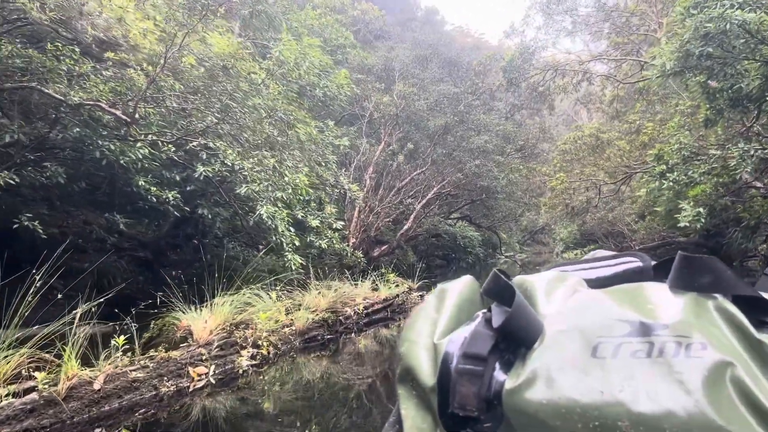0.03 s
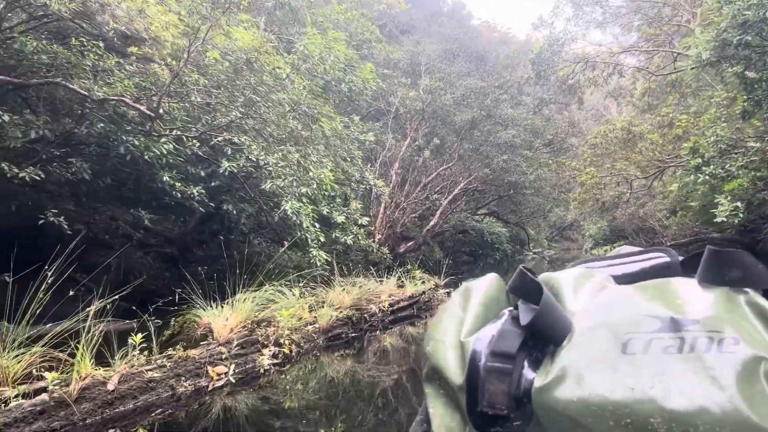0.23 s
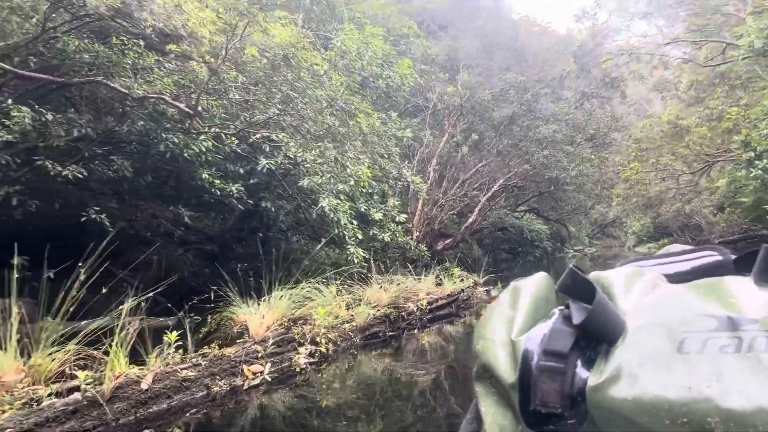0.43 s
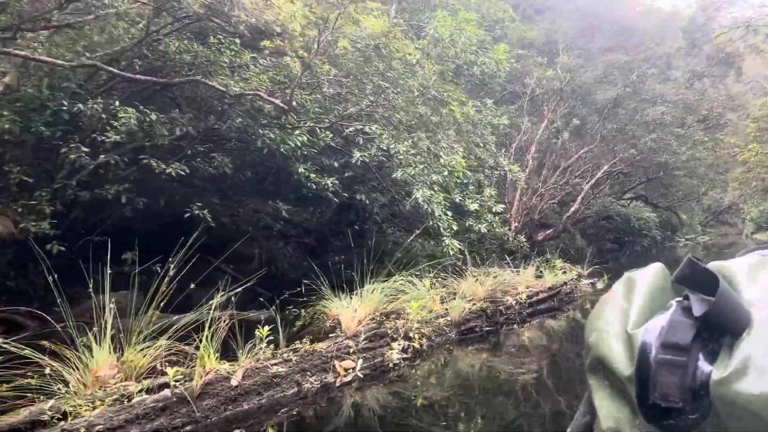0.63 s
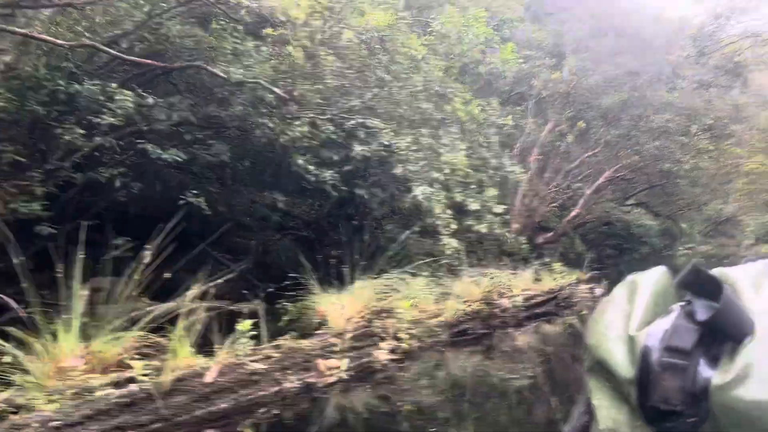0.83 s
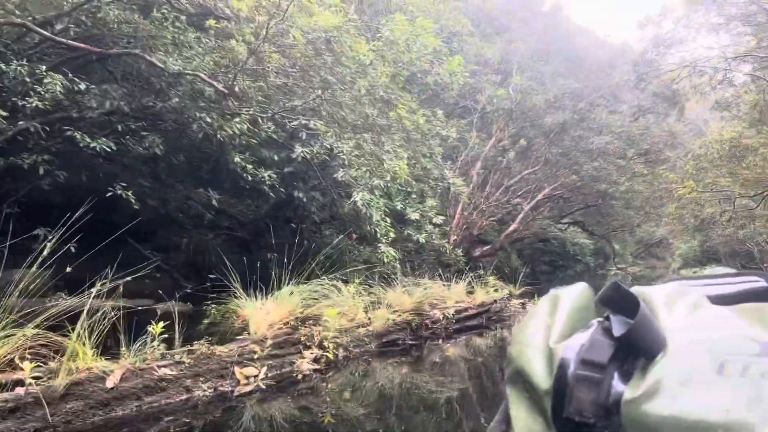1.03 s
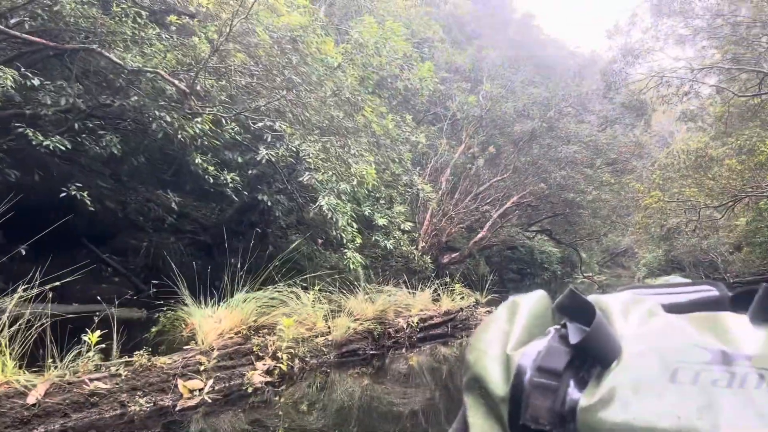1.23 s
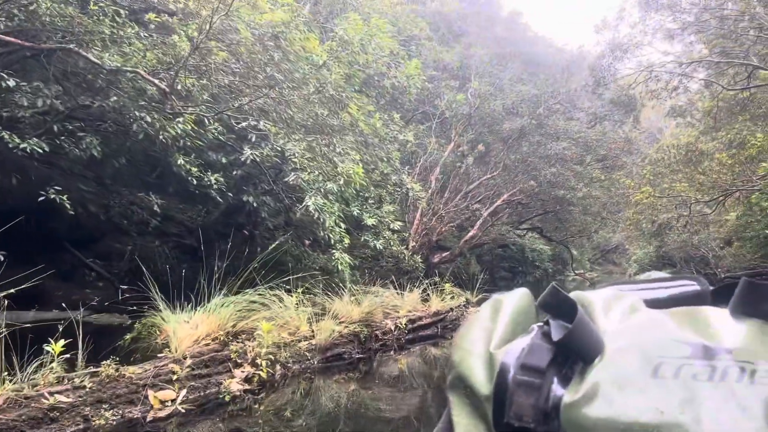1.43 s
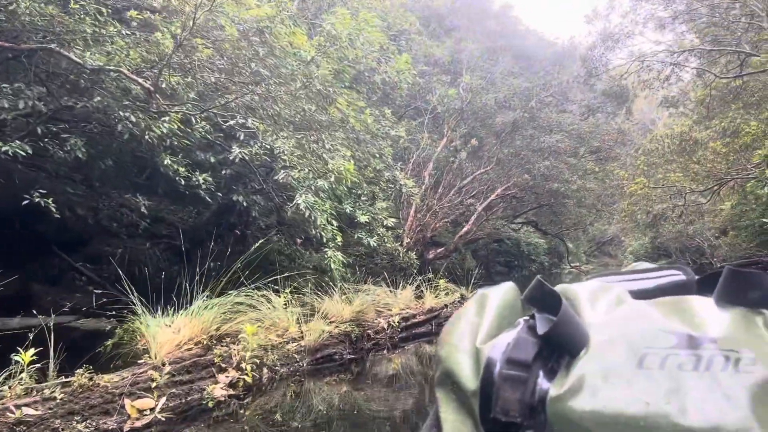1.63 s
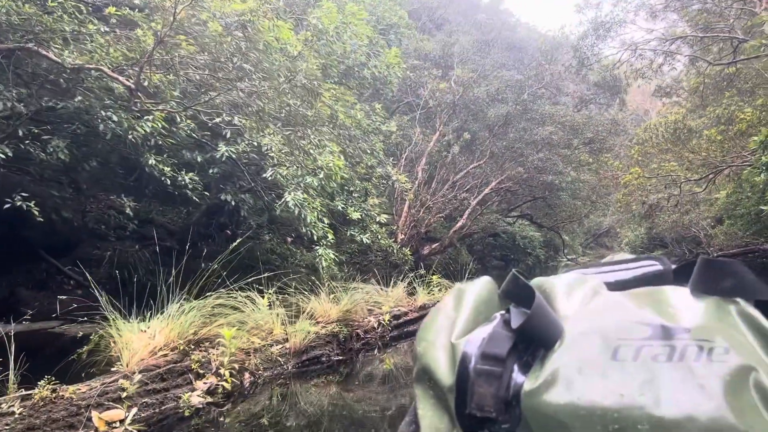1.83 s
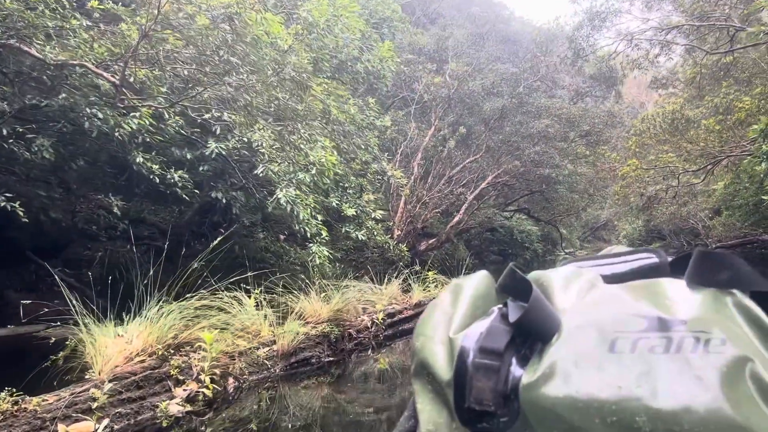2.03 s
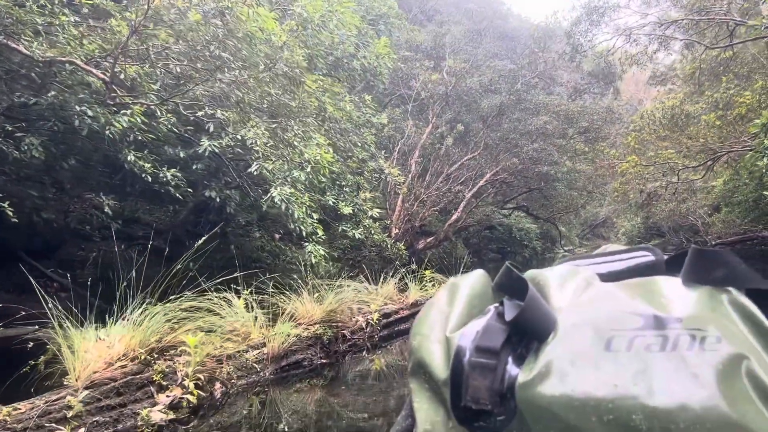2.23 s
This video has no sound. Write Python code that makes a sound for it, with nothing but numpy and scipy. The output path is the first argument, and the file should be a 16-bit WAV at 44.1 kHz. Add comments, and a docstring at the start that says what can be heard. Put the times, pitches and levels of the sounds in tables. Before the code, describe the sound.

Low rumbling, rubbing and hollow knocks from a handled camera, over faint lapping water.

```python
"""Low rumbling, rubbing and hollow knocks, right at the microphone: a hand-held camera is being
turned, and the grip shakes it and sets its shell ringing. It rides in an inflatable raft drifting
on a calm forest creek. Close by, water laps and drips beside the hull in small ringing bubbles.
Behind lies a soft wash of water and air, and small birds call thinly from far off in the trees."""
import sys
import numpy as np
from scipy import signal
from scipy.fft import rfft, irfft
from scipy.io import wavfile

SR = 44100
rng = np.random.default_rng(int(sys.argv[2]) if len(sys.argv) > 2 else 0)


def master_out(mix):
    """Clip the mix to full scale and print it as 16-bit PCM to the path in sys.argv[1]."""
    frames = np.transpose(np.atleast_2d(mix))
    ceiling = np.clip(frames, -1, 1)
    pcm = np.round(ceiling * 32767).astype(np.int16)
    wavfile.write(sys.argv[1], SR, pcm)


N = 101429
T = np.arange(N) / SR
HZ = np.fft.rfftfreq(N, 1 / SR)

# Knocks on the camera. Each row: start in seconds, ring level in dB, hardness as a cut-off in Hz,
# stretch factor of the ring time, left over right in dB, thump level in dB, thump pitch in Hz.
SHELL_KNOCKS = [(0.147, -33.5, 1500, 1.07, 1.5, -54.5, 108), (0.236, -33, 737, 1.1, -2.5, -22, 106.6),
                (.261, -32, 727, 1.3, 2, -39.5, 65), (0.4889, -38, 1110, 0.64, 1, -39, 99),
                (0.514, -31.5, 705, 0.72, -0.5, -34, 178.5), (0.8558, -9.9, 4300, 1.08, 1, -45.5, 61),
                (.9037, -12.5, 720, .4, 0.5, -30, 125.8), (1.044, -37, 1340, 1.7, 1.5, -24.5, 97),
                (1.13, -38, 1700, 2, -0.5, -31.5, 120), (1.1933, -28, 2200, 1.05, 0.5, -45.5, 110),
                (1.195, -11, 634, 0.86, 1.5, -40.5, 113.6), (1.197, -10, 880, 0.41, -3.5, -35, 97.3),
                (1.3139, -32, 973, 0.88, 5.5, -26.5, 140), (1.328, -15.5, 400, 0.74, 4, -37.5, 133),
                (1.375, -38, 497, 0.88, 1, -42, 103), (1.432, -39.5, 800, 0.58, -2, -42, 141),
                (1.653, -24, 510, 0.4, 4, -38, 108.5), (1.678, -33.5, 1500, 0.47, -1.5, -41, 120),
                (1.702, -29.5, 850, 0.8, 4.5, -36, 118.5), (1.725, -22.5, 450, 1.1, 0.5, -39, 133),
                (1.75, -17.5, 474, 0.8, 4, -17.5, 120), (1.76, -26, 880, 0.32, 4, -24, 120),
                (1.823, -36, 895, 0.76, 7, -30, 120), (2.081, -36, 1010, 0.67, 7, -31, 106.5)]
# The shell's modes. Each row: pitch in Hz, relative level in dB, unstretched time to peak in seconds,
# phase lead of the left side in radians.
SHELL_MODES = [(302, -18, 0.0025, .1), (445, -1.5, 0.0024, 0.23), (732, 2, 0.0011, 0.32),
               (886, -8.5, 0.0021, 1.63), (1645, -2, 0.00088, 1.5), (2042, -14, 0.0015, 1.5),
               (2920, -10, 0.0005, 0.43), (4900, -11, 0.0005, 1.6), (6760, -21, 0.00032, .6)]
# Close gulps and thuds. Each row: start in seconds, level in dB, first and last pitch in Hz,
# length in seconds.
SINKING_GULPS = [(.5125, -20, 300, 105, .026), (.855, -13, 680, 438, .0175), (.902, -14, 480, 240, .008),
                 (.9092, -6, 185, 46, .049), (1.2026, -14.5, 130, 90, .028)]
# Swings of the camera. Each row: middle in seconds, level in dB, pitch in Hz, length in seconds.
CAMERA_BUMPS = [(.283, -12, 65.7, 0.09), (.427, -16, 62, 0.11), (.487, -14, 55, .05),
                (0.575, -14, 52, 0.076), (.713, -15, 55, .06), (.798, -14, 48, .04),
                (0.851, -11.5, 57, 0.06), (.885, -14.5, 62, 0.045), (1.67, -21, 60, .05)]
# Hollow resonances of the shell. Each row: pitch in Hz, width in Hz, relative level in dB.
HOLLOW_MODES = [(104, 44, 5), (222, 20, -6), (371, 36, 1.5)]
# Drips beside the hull. Each row: start in seconds, level in dB, first pitch in Hz,
# seconds to fall 60 dB, left over right in dB.
HULL_DRIPS = [(.226, -41.5, 2900, 0.0083, -1), (.366, -36, 4300, 0.0038, 0), (0.391, -41, 3700, 0.0043, 1),
              (0.467, -31, 5600, 0.0019, -2), (0.483, -36.5, 5400, 0.0028, -8),
              (.668, -39.5, 3700, 0.0032, 1), (.784, -29.5, 6130, 0.0025, 0),
              (0.7943, -27.5, 4600, 0.0014, -3), (0.793, -42, 2480, 0.031, 13.5),
              (1.328, -44.5, 2900, 0.01, 6), (1.369, -47, 2030, 0.017, 5), (1.652, -38.5, 3940, 0.0024, 16),
              (1.677, -31.5, 2920, 0.0034, 6), (1.758, -42, 2970, 0.006, -0.5)]
# Distant calls. Each row: start and length in seconds, level in dB, first and last pitch in Hz,
# buzz width in Hz.
BIRD_CALLS = [(1.855, 0.14, -61, 6240, 6800, 1000), (1.925, 0.05, -61.5, 6970, 7170, 21),
              (2.074, 0.05, -67.5, 7450, 8000, 430), (2.08, 0.2, -81.5, 8030, 7800, 40),
              (2.168, .035, -61.5, 5900, 5070, 1300), (2.237, 0.067, -58.5, 6480, 6760, 820),
              (2.243, 0.032, -61, 6060, 6240, 40), (2.158, 0.127, -55.5, 875, 1015, 18)]

# How each noise swells and fades. Each row: time in seconds, level in dB.
RUMBLE_CURVE = [(0, -39), (.12, -52.5), (.2, -26), (.27, -26), (.36, -31), (.49, -26), (.63, -28.5),
                (.76, -24), (.84, -25), (.94, -29), (1.0, -30), (1.06, -22.5), (1.11, -42), (1.15, -24),
                (1.27, -28), (1.41, -29), (1.54, -39), (1.63, -26.5), (1.75, -32.5), (1.86, -41.5),
                (2.02, -44.5), (2.12, -40), (2.2, -44), (2.3, -46)]
RUB_CURVE = [(0, -57), (.13, -51.5), (.17, -37), (.27, -44.5), (.33, -50), (.42, -43.5), (.48, -40.5),
             (.6, -53.5), (.72, -43.5), (.82, -38.5), (.89, -29), (.95, -45), (1.16, -44), (1.27, -49.5),
             (1.54, -49), (1.66, -38.5), (1.77, -37.5), (1.82, -40.5), (1.87, -53), (2.02, -50), (2.1, -45),
             (2.15, -59.5), (2.3, -53)]
DRAG_CURVE = [(1.3, -74), (1.332, -36.5), (1.355, -58), (1.383, -48), (1.42, -53), (1.5, -61.5),
              (1.58, -50), (1.69, -44.5), (1.71, -33), (1.81, -34.5), (1.87, -53.5), (1.94, -59),
              (2.06, -49.5), (2.11, -43.5), (2.14, -60.5), (2.3, -60.5)]
WASH_CURVE = [(0, -46), (.6, -45.5), (1.2, -47), (1.6, -49.5), (2.3, -50.5)]
HISS_CURVE = [(0, -60), (.5, -67), (1.2, -68.5), (1.5, -74), (2.3, -74)]
# The tone of each noise. Each row: frequency in Hz, relative spectral density in dB.
RUMBLE_SPECTRUM = [(10, -13), (25, -14.5), (40, -6.5), (58, -1), (75, -7.5), (110, -15.5), (160, -21.5),
                   (250, -44), (500, -62), (1200, -76.5)]
RUB_SPECTRUM = [(40, -23.5), (80, -4.5), (115, 4), (170, -16.5), (215, 0.5), (280, -2), (375, -2.5),
                (480, -4), (750, -13), (1100, -22), (1700, -28), (2400, -32.5), (3000, -32), (4000, -43),
                (7000, -51.5), (9000, -92.5)]
WASH_SPECTRUM = [(30, -7), (120, 2), (250, -8), (420, -21), (650, -11.5), (960, -5), (1200, -18.5),
                 (1800, -19.5), (2600, -28), (4500, -30), (6500, -50), (8000, -48.5), (12000, -45)]
HISS_SPECTRUM = [(1000, -35.5), (2200, 6.5), (3500, -7.5), (5000, 1), (6600, -1), (7500, -14.5),
                 (8500, -26.5), (12000, -51)]
# How alike the microphone's two sides are. Each row: frequency in Hz, correlation from 0 to 1.
STEREO_LIKENESS = [(50, 0.96), (250, 0.91), (500, 0.96), (1000, 0.056), (2000, 0.11), (4000, 0.074),
                   (8000, 0.3)]
# The lean to the left. Each row: frequency in Hz, dB added on the left and taken off the right.
LEFT_LEAN = [(100, 0), (700, 0), (2200, 2.4), (5000, 0), (8000, 0.076)]

SIDES = np.array([[.5], [-.5]])  # splits a difference between left and right


def knocks():
    """Knocks at the microphone thump and ring the shell; harder ones reach its higher modes."""
    out, t = np.zeros((2, N)), T[:SR // 4]
    thump_rise_s, thump_t60 = 0.001, 0.13
    for start, ring_db, hard_hz, stretch, pan_db, thump_db, thump_hz in SHELL_KNOCKS:
        ring = 0
        for hz, mode_db, peak_s, lead in SHELL_MODES:
            age = t / (peak_s * stretch)
            swell = amp(mode_db) * age * np.exp(1 - age)
            ring = ring + swell * np.sin(2 * np.pi * hz * t + SIDES * lead)
        ring = filtered(ring, 3, [.13 * hard_hz, hard_hz], "band")
        thump = amp(thump_db - 60 * t / thump_t60) * np.sin(2 * np.pi * thump_hz * t)
        thump *= 1 - np.exp(-(t / thump_rise_s) ** 2)
        add(out, start, -amp(ring_db + SIDES * pan_db) * ring - thump)
    treble = filtered(out, 2, 1500, "high")  # the hard part comes back from hull and bank
    return out + amp(-9) * echoes(treble, t60=0.14)


def gulps():
    """Short round tones, close up, that swell early, drop quickly in pitch and stop."""
    out = np.zeros((2, N))
    for start, db, first_hz, last_hz, length in SINKING_GULPS:
        progress = T[T < length] / length
        hz = last_hz + (first_hz - last_hz) * np.exp(-progress / .12)
        swell = amp(db) * np.sin(np.pi * progress ** .55)
        add(out, start, swell * np.sin(2 * np.pi * np.cumsum(hz) / SR))
    return out


def bumps():
    """Heavy swings of the whole camera reach the microphone as brief bass pulses."""
    out = np.zeros(N)
    for middle, db, hz, length in CAMERA_BUMPS:
        swell = amp(db) * np.cos(np.pi * np.clip((T - middle) / length, -.5, .5))
        out += swell * np.cos(2 * np.pi * hz * (T - middle))
    return out


def rumble():
    """The moving grip shakes the camera around one low resonance."""
    shake = colour(rng.standard_normal((2, N)), RUMBLE_SPECTRUM)
    window = signal.windows.hann(int(0.07 * SR))
    power = signal.fftconvolve((shake ** 2).mean(0), window, "same")
    steady = unit(shake / np.sqrt(abs(power) + 1e-9))  # evens out the noise's own swells
    return amp(0.5) * level(RUMBLE_CURVE) * steady


def rub():
    """Tiny uneven slips of the grip carry through the shell to the microphone."""
    slips_per_s = 800
    slips = (rng.random((2, N)) < slips_per_s / SR) * rng.choice([-1, 1], (2, N))
    return level(RUB_CURVE) * colour(slips * uneven((2, N), spread_db=3.5), RUB_SPECTRUM)


def drag():
    """A slower drag keeps three hollow shell resonances humming, each wavering in pitch."""
    hum = np.zeros(N)
    for hz, width_hz, db in HOLLOW_MODES:
        band = rfft(rng.standard_normal(N)) / (1 + ((HZ - hz) / (width_hz / 2)) ** 2)
        ring = signal.hilbert(irfft(band, N))
        hum += amp(db) * unit(ring.real / np.sqrt(abs(ring) + 1e-12))  # softens the level swings
    return level(DRAG_CURVE) * hum


def water():
    """Beside the raft, a few clear drips stand over the faint bubbling of ripples on the hull."""
    out = np.zeros((2, N))
    pops_per_s, pitches = 420, np.geomspace(400, 2000, num=24)
    for hz in pitches:
        pops = (rng.random(N) < pops_per_s / len(pitches) / SR) * uneven(N, spread_db=7.5)
        left_share = rng.random(N)
        panned = pops * np.array([left_share, 1 - left_share])
        ring = bubble(hz, t60=30 * np.pi / hz)
        out += signal.oaconvolve(panned, ring[None], axes=1)[:, :N] / np.sqrt(hz)
    out = amp(-55.5) * unit(out)
    for start, db, hz, t60, pan_db in HULL_DRIPS:
        add(out, start, amp(db + SIDES * pan_db) * bubble(hz, t60))
    return out


def bubble(hz, t60, rise_s=.0004, glide_per_s=12):
    """A small bubble rings and rises in pitch as it dies away."""
    t = T[:SR // 10]
    envelope = amp(-60 * t / t60) * (1 - np.exp(-t / rise_s))
    return envelope * np.sin(2 * np.pi * hz * (t + glide_per_s * t ** 2 / 2))


def wash():
    """Far water and air, with a thin hiss that fades as the camera turns."""
    creek = level(WASH_CURVE) * colour(rng.standard_normal((2, N)), WASH_SPECTRUM)
    hiss = level(HISS_CURVE) * colour(rng.standard_normal((2, N)), HISS_SPECTRUM)
    return creek + hiss


def birds():
    """Far-off birds call in thin buzzy glides, smeared by the trees."""
    calls = np.zeros((2, N))
    for start, length, db, first_hz, last_hz, width_hz in BIRD_CALLS:
        progress = np.clip((T - start) / length, 0, 1)
        swell = amp(db) * np.sqrt(abs(np.sin(np.pi * progress)))
        buzz = unit(filtered(rng.standard_normal((2, N)), 3, width_hz / 2, "low"))
        hz = first_hz + (last_hz - first_hz) * progress
        calls += swell * buzz * np.sqrt(2) * np.sin(2 * np.pi * np.cumsum(hz) / SR)
    return calls + echoes(calls, t60=0.55)


def echoes(x, t60):
    """The surroundings return a diffuse dying tail, different on each side."""
    t = T[:SR]
    tail = rng.standard_normal((2, SR)) * amp(-60 * t / t60) * (1 - np.exp(-t / 0.00043))
    return signal.fftconvolve(x, tail / np.linalg.norm(tail[0]), axes=1)[:, :N]


def colour(pair, spectrum):
    """Gives two unrelated signals a spectrum, alike in the bass and apart in the treble."""
    first, second = rfft(pair)
    angle = np.arccos(np.clip(over_frequency(STEREO_LIKENESS), -1, 1)) / 2
    mid, side = first * np.cos(angle), second * np.sin(angle)
    lean = amp(over_frequency(LEFT_LEAN))
    stereo = np.array([(mid + side) * lean, (mid - side) / lean])
    return unit(irfft(stereo * amp(over_frequency(spectrum)), N))


def over_frequency(points):
    """Joins a table's points on a log frequency axis."""
    hz, value = np.transpose(points)
    return np.interp(np.log(HZ + 1), np.log(hz + 1), value)


def level(points):
    """A dB curve over time as a gain."""
    return amp(np.interp(T, *np.transpose(points)))


def uneven(shape, spread_db):
    """Random gains: many small, a few large."""
    return amp(spread_db * np.minimum(rng.exponential(1, shape), 3))


def filtered(x, order, hz, kind):
    """Butterworth filter."""
    return signal.sosfilt(signal.butter(order, hz, kind, fs=SR, output="sos"), x)


def amp(db):
    """Decibels to gain."""
    return 10 ** (np.asarray(db) / 20)


def unit(x):
    """Scales to rms 1."""
    return x / np.sqrt(np.mean(x ** 2) + 1e-20)


def add(mix, start, sound):
    """Mixes a sound in from a start in seconds."""
    part = mix[:, max(round(start * SR), 0):][:, :sound.shape[-1]]
    part += sound[..., :part.shape[1]]


def scene():
    """Handling at the microphone, water around the raft, birds far off."""
    return knocks() + gulps() + bumps() + rumble() + rub() + drag() + wash() + water() + birds()


def record(dry):
    """The camera's microphone dulls sharply above about 8 kHz and cuts off at 15 kHz."""
    dull = signal.firwin2(255, [0, 7900, 8500, SR / 2], amp([0, 0, -14, -14]), fs=SR)
    band_limit = signal.firwin(511, 15000, window=("kaiser", 9), fs=SR)
    return signal.oaconvolve(dry, np.convolve(dull, band_limit)[None], "same")


dry = scene()
out = record(dry)
master_out(out)
```